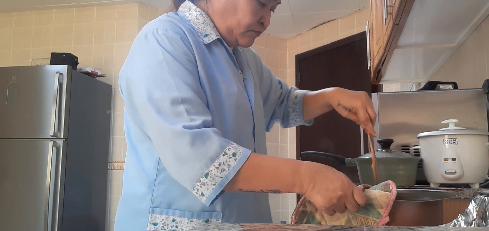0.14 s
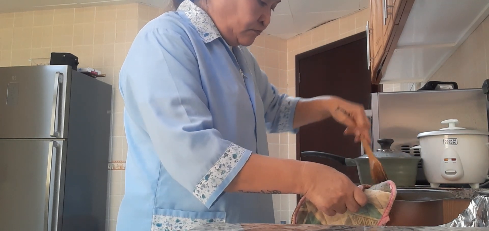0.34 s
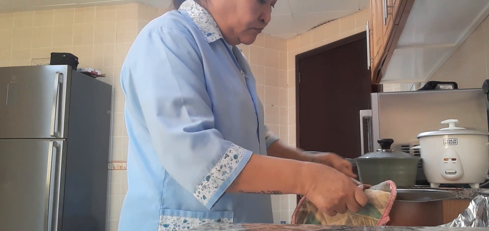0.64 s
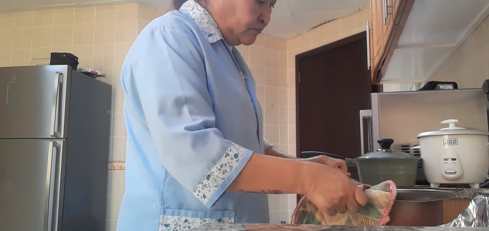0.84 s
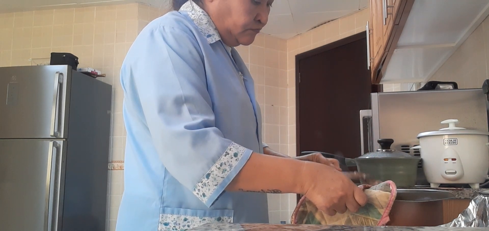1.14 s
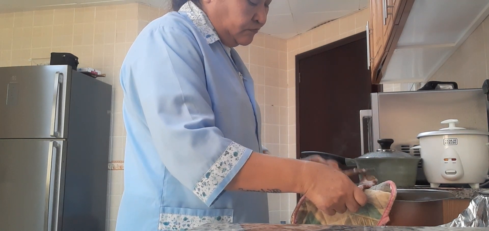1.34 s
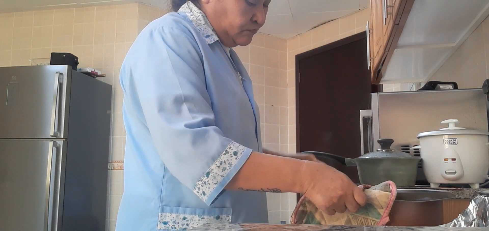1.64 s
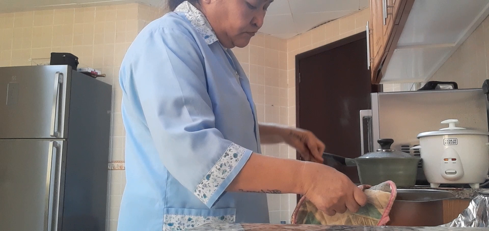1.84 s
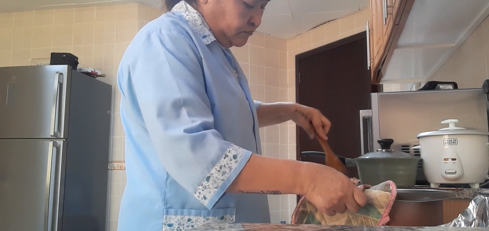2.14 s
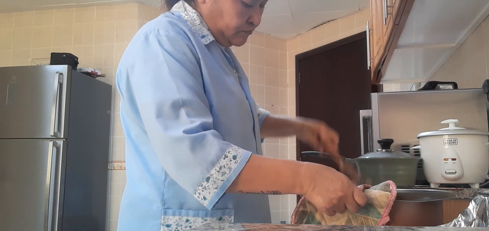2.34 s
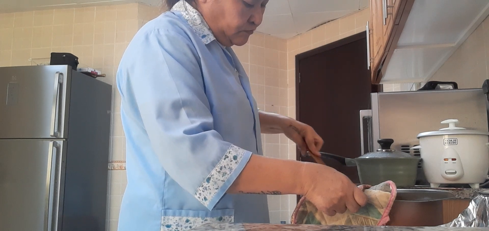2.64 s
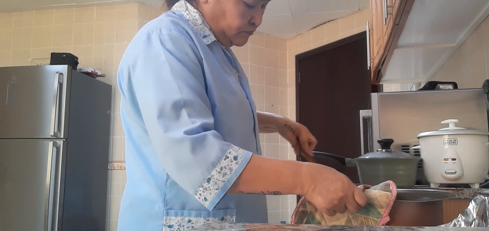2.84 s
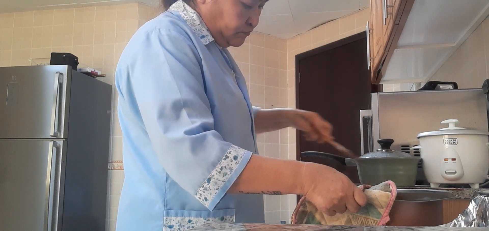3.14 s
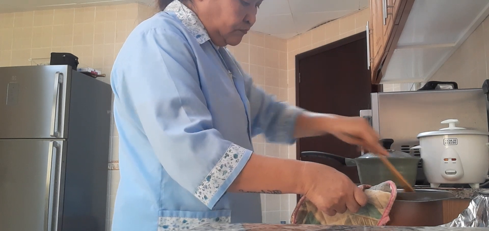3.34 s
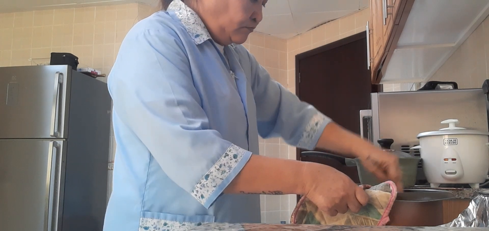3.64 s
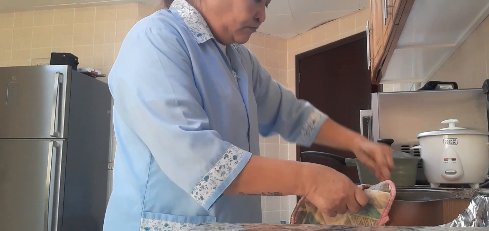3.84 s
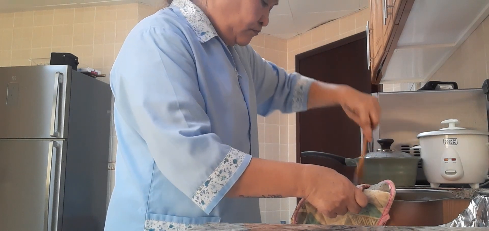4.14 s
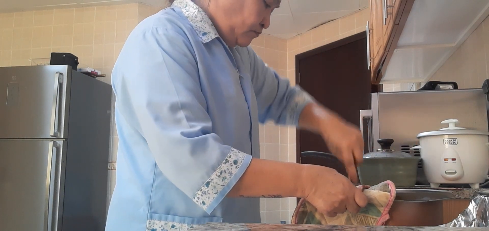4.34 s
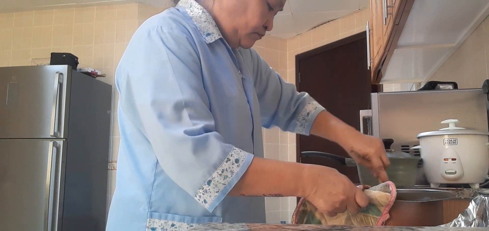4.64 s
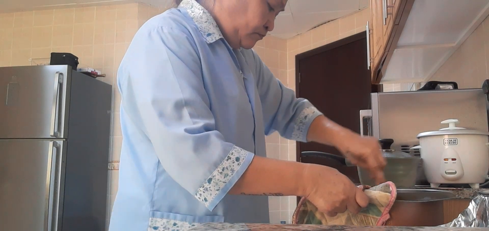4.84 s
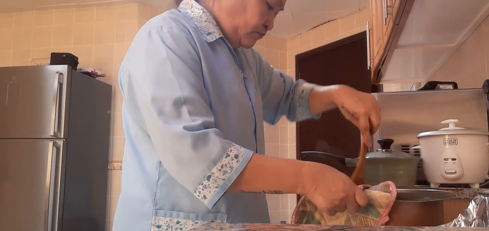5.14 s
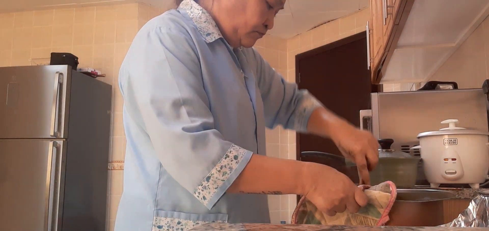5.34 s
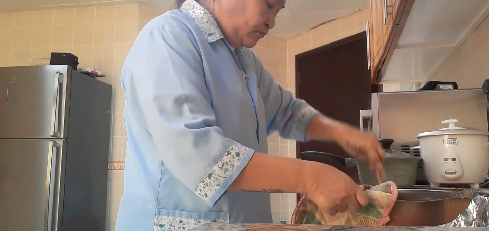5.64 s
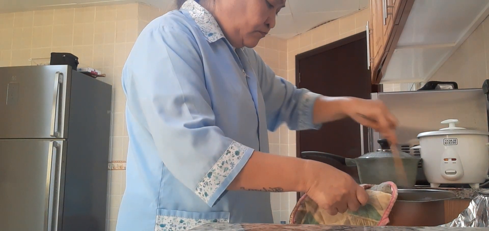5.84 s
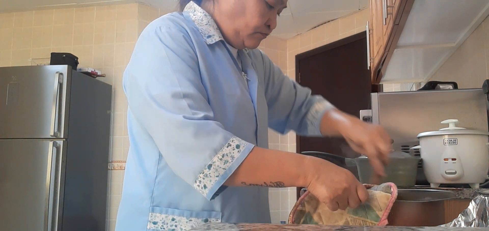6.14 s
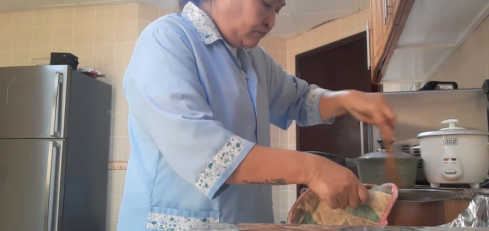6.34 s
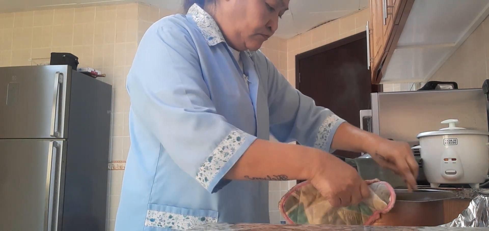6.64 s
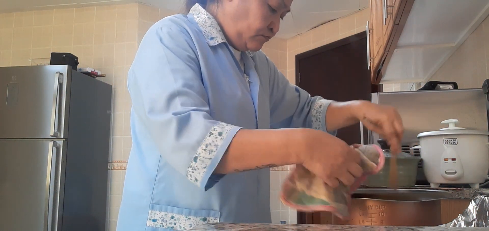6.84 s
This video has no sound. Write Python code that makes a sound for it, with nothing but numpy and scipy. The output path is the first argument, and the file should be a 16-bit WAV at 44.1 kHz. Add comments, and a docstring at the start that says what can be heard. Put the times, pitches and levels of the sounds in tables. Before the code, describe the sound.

A wooden spatula knocks against a metal pot and scrapes food around in it, over a faint sizzle in a kitchen.

```python
"""In a tiled kitchen, a wooden spatula knocks against a metal pot, twice against a frying pan at the back, and
pushes food around in the pot. Each impact excites the metal's modes, which decay freely and reverberate in the
hard room. The strokes rub out a hollow rasp by stick-slip friction; bubbles bursting on the hot metal give a
faint sizzle that flares as the food is turned. A burner hisses and a fridge hums underneath."""
import sys
import numpy as np
from scipy import signal
from scipy.fft import rfft, irfft, next_fast_len
from scipy.io import wavfile
from scipy.ndimage import uniform_filter1d

SR = 44100
rng = np.random.default_rng(int(sys.argv[2]) if len(sys.argv) > 2 else 0)


def dump(signal):
    """Clip the signal to [-1, 1] and save it as 16-bit WAV at the path in sys.argv[1]."""
    limited = np.clip(np.atleast_2d(signal).T, -1, 1)
    pcm = np.round(limited * 32767).astype(np.int16)
    wavfile.write(sys.argv[1], SR, pcm)


N = 308259
PADDED = next_fast_len(N + SR // 10)

# spectrum of burner and room: f/Hz, level/dB
BURNER_SPECTRUM = [(25, -35), (55, -10), (110, 1), (150, -10), (205, -7.5), (290, -12), (350, -2),
                   (430, -19.5), (510, -7.5), (1080, -6), (1280, -16.5), (2700, -15.5), (4500, -23.5),
                   (15500, -30.5)]
# partials of the fridge's hum: f/Hz, level/dB
FRIDGE_PARTIALS = [(99, -69), (196, -66), (352, -79)]
# spectrum of the tiny bubbles: f/Hz, level/dB
FIZZ_SPECTRUM = [(800, -7), (2000, 1), (3000, 1), (5000, -3.5), (5700, -1.5), (6050, -1), (6500, -4),
                 (7500, -3), (8200, -3.5), (9500, -16.5), (12000, -13.5), (15500, -21)]
# spectrum of the larger, spitting bubbles: f/Hz, level/dB
SPIT_SPECTRUM = [(1000, -25), (2500, -36), (8000, -7), (12000, 19), (15500, 12)]
# fresh food is turned onto the hot metal: t/s, peak sizzle level/dB
FOOD_TURNS = [(2.1, -56.5), (3.58, -51), (4.32, -48), (5.3, -55), (6.02, -52), (6.5, -52)]
# bands of an impact: lower f/Hz, upper f/Hz, rise/s, clack over tail/dB, T60/s, share of the blow/dB
IMPACT_BANDS = [(79, 482, 0.0091, -5, 0.58, 1.5), (497, 1770, 0.0023, 5.5, 0.75, -1),
                (1340, 3340, 0.00044, -11, 0.84, -5), (3740, 7140, 0.000093, 0, 0.81, -0.1),
                (8150, 14600, 0.0016, -6, 0.63, -2)]
# bare wood strikes the wall: t/s, force/dB, hardness/(dB per octave), contact cut-off f/Hz,
# brightest f/Hz, modes over clatter/dB, spot f/Hz, spot over force/dB, wall f/Hz, wall over force/dB
BARE_KNOCKS = [ (0.581, -36, 0.83, 6800, 4880, 7, 1558, 6, 1777, 8.5),
               (1.437, -40.5, -1.1, 15200, 4530, -0.5, 994, 20.5, 3900, 0.5),
               (2.448, -28, 1.6, 9900, 6470, 0, 1062, 15, 4140, 7.5),
               (3.443, -49, 2.17, 8800, 4020, 0.5, 480, 5, 1676, 3),
               (4.272, -44, 0.23, 9000, 2730, -10, 324, -16, 1820, 2.5),
               (4.970, -46.5, -1.65, 16000, 6500, -6, 760, 23, 364, -8),
               (5.208, -35.5, 0.63, 10300, 7200, -19, 1430, 9.5, 1124, 7.5),
               (5.219, -41, 3, 8400, 2730, -24, 1130, 14.5, 1860, 10),
               (5.988, -50, 1, 8900, 2870, -3, 337, 7, 1150, -6),
               (6.504, -54.5, 1, 7000, 6700, -19, 497, -3, 6000, -17),
               (6.984, -35.5, 0.46, 14900, 6000, 1, 720, 13.5, 1630, -1)]
# dull blows shake the whole pot: t/s, force/dB, contact cut-off f/Hz, spot f/Hz, spot over force/dB
CUSHIONED_BUMPS = [(0.589, -26.5, 1000, 525, 10.5), (0.725, -38.5, 3300, 1130, 6),
                   (0.948, -46, 4200, 980, 14), (0.995, -61, 4220, 970, 15), (1.115, -67.5, 4200, 920, 16),
                   (1.452, -45.5, 5000, 201.6, 20), (1.595, -47, 3430, 625, 6),
                   (1.674, -50, 3200, 1034, 15), (2.212, -60, 4940, 454, 11), (2.484, -46, 6500, 337, 26),
                   (3.716, -55, 3600, 358, 24), (3.768, -64, 3400, 363, 21.5), (4.783, -49, 1730, 390, 6),
                   (6.135, -55.5, 2200, 423, 12)]
# resolved modes of the pot: f/Hz, relative level/dB, T60/s
POT_MODES = [(186.6, -12.5, 1), (249, -8, 0.46), (332.2, 3.5, 0.46), (356.4, 3.5, 0.55), (519, 0, 0.29),
             (530, 3.5, 0.35), (614, -5, 0.74), (644, -4, 0.44), (795, 3.5, .42), (1007, -9, .8),
             (1199, -1.5, .5), (1600, -3.5, .65), (1712, -18, .75), (1820, -13, .7), (4016, -17.5, 0.67),
             (4480, -11, 0.57), (5600, -36, 0.78), (6340, -17.5, 0.77), (7050, -29, 0.56)]
# crowded, unresolved modes of pot and stove: f/Hz, bandwidth/Hz, level/dB
MODE_CLUSTERS = [(216, 115, 20.5), (353, 71, 19.5), (502, 83, 13), (609, 68, 13), (770, 76, 9.5),
                 (982, 226, 17.5), (1174, 71, 16.5), (1780, 460, 5), (2350, 780, 9.5), (3773, 610, 8.5),
                 (4170, 330, -3), (5240, 890, 4), (5680, 60, 9), (6150, 250, 4.5), (7200, 500, 3)]
# broad spectrum of the clatter: f/Hz, level/dB
CLATTER_SPECTRUM = [(90, 7.5), (145, 3), (220, 5), (800, -2), (1200, -9), (1450, -4), (3350, -7.5),
                    (4200, -2), (6000, -5.5), (7800, -7.5), (9200, -22), (15500, -23)]
# pushes through the food: peak pressure t/s, length/s, level/dB, rasp f/Hz
SPATULA_PUSHES = [(3.584, 0.48, -49, 720), (3.713, 0.045, -37, 470), (3.862, 0.31, -50, 890),
                  (4.468, 0.2, -46.5, 780), (4.636, 0.17, -43.5, 800), (4.846, 0.065, -54, 390),
                  (4.957, 0.11, -33, 830), (5.0, 0.089, -34, 570), (5.375, 0.035, -38.5, 620),
                  (5.443, 0.2, -42, 686), (5.581, 0.35, -49, 570), (6.14, 0.077, -43.5, 490),
                  (6.318, 0.33, -55.5, 990), (6.603, .18, -51.5, 730), (6.751, 0.17, -43.5, 634)]
# spectrum of the friction: f/Hz, level/dB
RASP_SPECTRUM = [(70, -5), (190, -8), (350, -0.5), (1080, -3), (1320, -20), (2200, -8), (4000, -30),
                 (9000, -17)]
# coherence of the room's field between two microphones: f/Hz, correlation
COHERENCE = [(100, 1), (350, 0.85), (650, 0.71), (1200, 0), (2500, 0.092), (15000, 0)]
# imbalance of the microphone ports: f/Hz, left over right level/dB
PORT_BALANCE = [(60, -10.5), (180, -6), (350, -4.5), (1000, -1.5), (2000, -2.4), (4000, -2), (5000, -3),
                (6500, -7.5), (8000, -6), (9000, 10), (10000, 5.5), (11500, 5), (15000, -2)]


def gain_of(db):
    """Amplitude ratio of a level in decibels."""
    return 10 ** (np.asarray(db) / 20)


def unit_rms(x):
    """Normalisation to rms 1."""
    return x / np.sqrt(np.mean(x ** 2) + 1e-20)


def curve_at(points, hz):
    """Interpolation on a log-frequency axis."""
    f, value = np.transpose(points)
    return np.interp(np.log(hz + 1), np.log(f + 1), value)


def add(mix, s, sound):
    """Superposition of a stereo sound starting at time s."""
    part = mix[:, round(s * SR):][:, :sound.shape[1]]
    part += sound[:, :part.shape[1]]


def freqs(size):
    """Frequencies of the Fourier bins."""
    return np.fft.rfftfreq(size, 1 / SR)


def colour(x, spectrum):
    """Linear filtering by a tabulated spectrum, scaled to rms 1."""
    size = x.shape[-1]
    return unit_rms(irfft(rfft(x) * gain_of(curve_at(spectrum, freqs(size))), size))


def resonance(hz, centre, width):
    """Lorentzian resonance curve, 1 at its centre."""
    return 1 / (1 + (2 * (hz - centre) / width) ** 2)


def diffuse(size):
    """Noise spectra of a diffuse field at two points: coherent in the bass, unrelated in the treble."""
    left, unrelated = rfft(rng.standard_normal((2, size)))
    coherence = curve_at(COHERENCE, freqs(size))
    return np.array([left, coherence * left + np.sqrt(1 - coherence ** 2) * unrelated])


def steadied(x, size):
    """Division by the running rms evens out swells longer than size samples."""
    return x / np.sqrt(abs(uniform_filter1d((x ** 2).mean(0), size)) + 1e-20)


def burner(level_db=-53):
    """Stationary broadband noise: the burner's hiss as a diffuse field."""
    return gain_of(level_db) * colour(irfft(diffuse(N), N), BURNER_SPECTRUM)


def fridge(t, waver_rad=1.02):
    """Slow random phase modulation makes each partial of the hum waver."""
    out = 0
    for hz, db in FRIDGE_PARTIALS:
        drift = np.interp(t, np.linspace(0, t[-1], 70), rng.standard_normal(70))
        out = out + gain_of(db) * np.sqrt(2) * np.sin(2 * np.pi * hz * t + waver_rad * drift)
    return out


def grains(per_s, spread_db, dying_s, room_db, room_t60=0.52):
    """Shot noise: random tiny bursts of uneven size, each with a room tail, add in power."""
    sizes = gain_of(spread_db * np.minimum(rng.exponential(1, N), 4))
    impulses = sizes * (rng.random(N) < per_s / SR)
    t = np.arange(SR // 2) / SR
    burst = np.exp(-t / dying_s) + gain_of(room_db - 60 * t / room_t60)
    power = abs(signal.fftconvolve(impulses ** 2, burst ** 2)[:N])
    return np.sqrt(power) * irfft(diffuse(N), N)


def sizzle(t, simmer_db=-61, flare_s=0.12, fade_s=0.51, spits_db=-11.5):
    """Bursting bubbles are incoherent sources: each turn of the food adds its power to the simmer."""
    power = gain_of(simmer_db) ** 2
    for s, db in FOOD_TURNS:
        age = t - s
        flare = np.clip(age / flare_s, 0, 1) * np.exp(-np.maximum(age - flare_s, 0) / fade_s)
        power = power + (gain_of(db) * flare) ** 2
    fizz = colour(grains(per_s=2000, spread_db=1, dying_s=0.0025, room_db=-18), FIZZ_SPECTRUM)
    spits = colour(grains(per_s=45, spread_db=-0.5, dying_s=0.0022, room_db=-11), SPIT_SPECTRUM)
    return np.sqrt(power) * (fizz + gain_of(spits_db) * spits)


def blow_levels(force_db, hardness_db, cutoff_hz):
    """Impact spectrum by band: hardness tilts it to the treble, finite contact time cuts off the top."""
    lo, hi, *_, share_db = np.transpose(IMPACT_BANDS)
    hz = np.sqrt(lo * hi)
    contact_loss_db = 10 * np.log10(1 + (hz / cutoff_hz) ** 8)
    return force_db + share_db + hardness_db * np.log2(hz / 1000) - contact_loss_db


def pot_db(hz):
    """Modal overlap: crowded modes merge into broad peaks that colour knocks and strokes."""
    return sum(db * resonance(hz, f, width) for f, width, db in MODE_CLUSTERS)


def clatter(t, levels_db, bright_hz, clack_s=0.0095):
    """Dense modes sound as noise: a hard clack, then reverberation that builds slowest in the bass."""
    hz = freqs(len(t))
    bright_db = 9 * resonance(hz, bright_hz, 0.23 * bright_hz)
    field = diffuse(len(t)) * gain_of(curve_at(CLATTER_SPECTRUM, hz) + pot_db(hz) + bright_db)
    out = 0
    for (lo, hi, rise_s, clack_db, t60, _), db in zip(IMPACT_BANDS, levels_db):
        band = 1 / np.sqrt((1 + (lo / (hz + 1)) ** 16) * (1 + (hz / hi) ** 16))
        clack = gain_of(clack_db) * np.exp(-(t / clack_s) ** 2)
        envelope = (1 - np.exp(-t / rise_s)) * (clack + gain_of(-60 * t / t60))
        out = out + gain_of(db) * envelope * steadied(irfft(field * band, len(t)), size=1800)
    return out


def tock(t, hz, dying_s=0.012, room_db=-15, room_t60=0.7):
    """Damping by the wood leaves the struck spot one broad, short resonance, which the room prolongs."""
    f = freqs(len(t))
    outline = resonance(f, hz, 0.11 * hz) * f ** 2 / (f ** 2 + (0.53 * hz) ** 2)
    tone = steadied(irfft(diffuse(len(t)) * outline, len(t)), size=900)
    rise = 1 - np.exp(-t / (0.0014 + 0.5 / hz))  # a low pitch needs longer to build
    return tone * rise * (np.exp(-t / dying_s) + gain_of(room_db - 60 * t / room_t60))


def mode_bank(t, rise_cycles=3.3, waver=0.16):
    """The pot's normal modes as decaying phasors; reflections make each swell in and waver."""
    bank = []
    for hz, db, t60 in POT_MODES:
        channel_phase = np.arccos(curve_at(COHERENCE, hz)) * np.array([[0], [1]])
        drift = unit_rms(signal.resample(rng.standard_normal((2, 30)), len(t), axis=1))
        envelope = gain_of(db - 60 * t / t60) * (1 - np.exp(-t * hz / rise_cycles)) * (1 + waver * drift)
        bank.append(envelope * np.exp(1j * (2 * np.pi * hz * t + channel_phase)))
    return np.array(bank)


def ring(bank, levels_db, spot_hz, wall_hz=None):
    """Modal excitation: each mode takes the blow's level in its band, more near spot and wall pitch."""
    hz = np.transpose(POT_MODES)[0]
    band = np.searchsorted(np.transpose(IMPACT_BANDS)[1], hz)
    level_db = levels_db[band] + 7 * resonance(hz, spot_hz, spot_hz / 10)
    if wall_hz:
        level_db = level_db + 14 * resonance(hz, wall_hz, wall_hz / 10)
    phasors = np.exp(2j * np.pi * rng.random(len(hz)))
    return np.tensordot(gain_of(level_db) * phasors, bank, 1).real


def shimmer(t, hz, relative_width=0.15, rise_s=0.077, t60=0.62):
    """Close wall modes merge into narrow-band noise that swells just after the blow and sings on."""
    crowd = 1 / (1 + (2 * (freqs(len(t)) / hz - 1) / relative_width) ** 4)
    tone = steadied(irfft(diffuse(len(t)) * crowd, len(t)), size=2500)
    return tone * (1 - np.exp(-t / rise_s)) * gain_of(-60 * t / t60)


def impacts(bump_ring_db=-4):
    """Free vibration after impact: each blow clatters, tocks and rings; bare knocks also shimmer."""
    out, t = np.zeros((2, N)), np.arange(32768) / SR
    bank = mode_bank(t)
    for (s, force_db, hardness_db, cutoff_hz, bright_hz, ring_db,
         spot_hz, spot_db, wall_hz, wall_db) in BARE_KNOCKS:
        levels_db = blow_levels(force_db, hardness_db, cutoff_hz)
        add(out, s, clatter(t, levels_db, bright_hz))
        add(out, s, gain_of(force_db + spot_db) * tock(t, spot_hz))
        add(out, s, gain_of(ring_db) * ring(bank, levels_db, spot_hz, wall_hz))
        add(out, s, gain_of(force_db + wall_db) * shimmer(t, wall_hz))
    for s, force_db, cutoff_hz, spot_hz, spot_db in CUSHIONED_BUMPS:
        levels_db = blow_levels(force_db, hardness_db=-1.5, cutoff_hz=cutoff_hz)
        add(out, s, clatter(t, levels_db, bright_hz=4670))
        add(out, s, gain_of(force_db + spot_db) * tock(t, spot_hz))
        add(out, s, gain_of(bump_ring_db) * ring(bank, levels_db, spot_hz))
    return out


def stirring(build_share=0.4):
    """Stick-slip friction of wood on the pot's floor, filtered by the resonances of the hollow pot."""
    slips = grains(per_s=830, spread_db=2, dying_s=0.0047, room_db=-31)
    out, hz = np.zeros((2, N)), freqs(SR)
    t = np.arange(SR) / SR - 0.5  # one second centred on the peak pressure
    for s, length_s, db, pitch_hz in SPATULA_PUSHES:
        focus_db = 11 * resonance(hz, pitch_hz, 0.49 * pitch_hz)
        response = gain_of(curve_at(RASP_SPECTRUM, hz) + pot_db(hz) + focus_db)
        start = rng.integers(N - SR)
        rasp = irfft(rfft(slips[:, start:start + SR]) * response, SR)
        u = t / length_s  # the pressure builds while u < 0, then eases off
        pressure = np.exp(-np.where(u < 0, (u / build_share) ** 2, u / (1 - build_share)))
        add(out, s - 0.5, gain_of(db) * pressure * steadied(rasp, size=2000))
    return out


def tiles(x, echo_db=-8, latest_s=0.012, mirror_hz=1500, count=10):
    """Comb filtering: treble mirrored by tiles and cooker hood interferes with the direct sound."""
    hz = freqs(PADDED)
    delays = rng.uniform(latest_s / 10, latest_s, (count, 2, 1))
    echoes = sum(np.exp(-2j * np.pi * hz * delay) for delay in delays) / np.sqrt(count)
    share = gain_of(echo_db) * hz ** 2 / (hz ** 2 + mirror_hz ** 2)
    response = (1 + share * echoes) / np.sqrt(1 + share ** 2)
    return irfft(rfft(x, PADDED) * response, PADDED)[:, :N]


def scene():
    """Superposition of knocks, strokes, sizzle, burner and fridge between hard walls."""
    t = np.arange(N) / SR
    cooking = impacts() + stirring() + sizzle(t)
    rise = gain_of(-3.5 * np.maximum(1 - t / 1.1, 0))  # the background comes up over the first 1.1 s
    return tiles(cooking + rise * (burner() + fridge(t)))


def record(dry):
    """Frequency response: each microphone port colours its channel; a low-pass limits the band."""
    lean_db = curve_at(PORT_BALANCE, freqs(PADDED)) * np.array([[0.5], [-0.5]])
    heard = irfft(rfft(dry, PADDED) * gain_of(lean_db), PADDED)[:, :N]
    low_pass = signal.firwin(511, cutoff=15850, window=("kaiser", 9), fs=SR)
    return signal.oaconvolve(heard, low_pass[None], "same", axes=1)


dry = scene()
out = record(dry)
dump(out)
```